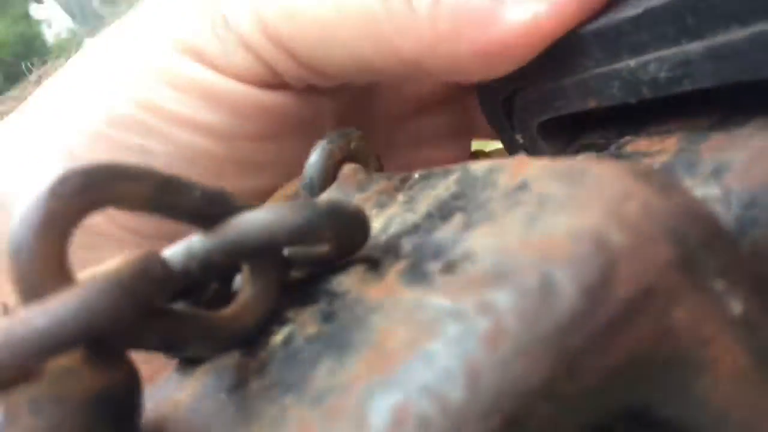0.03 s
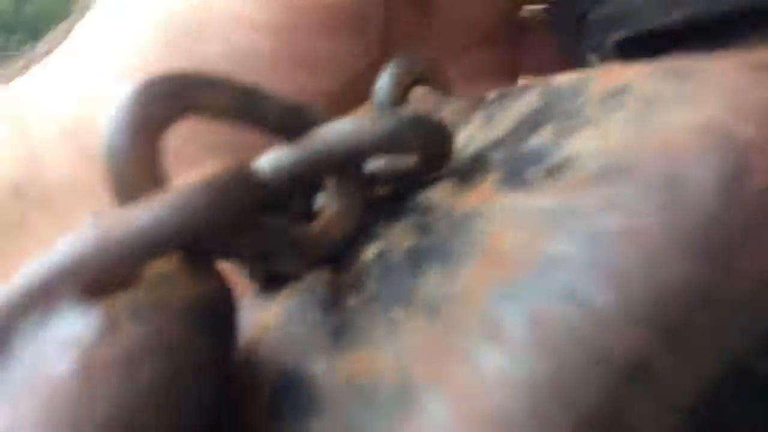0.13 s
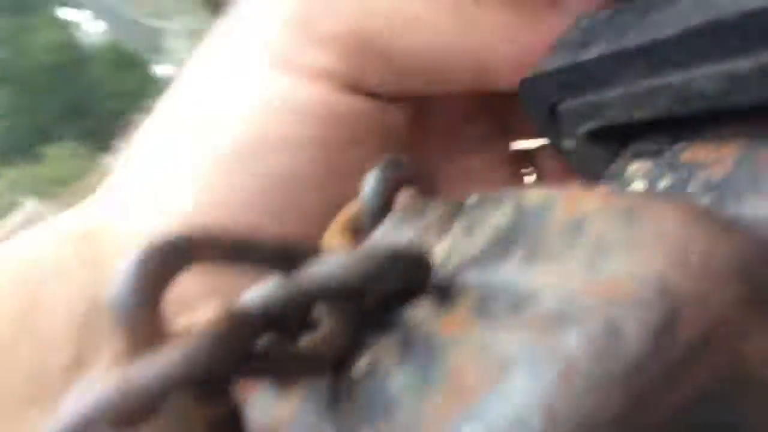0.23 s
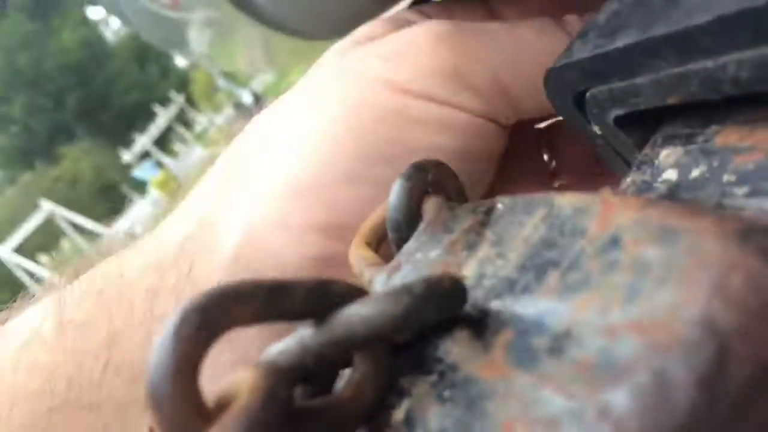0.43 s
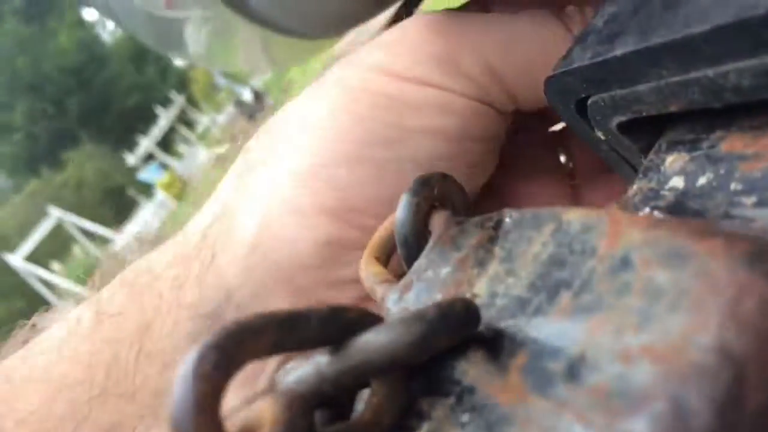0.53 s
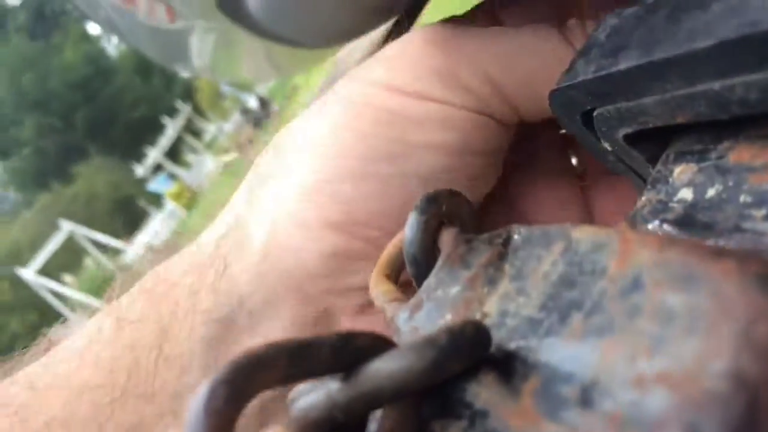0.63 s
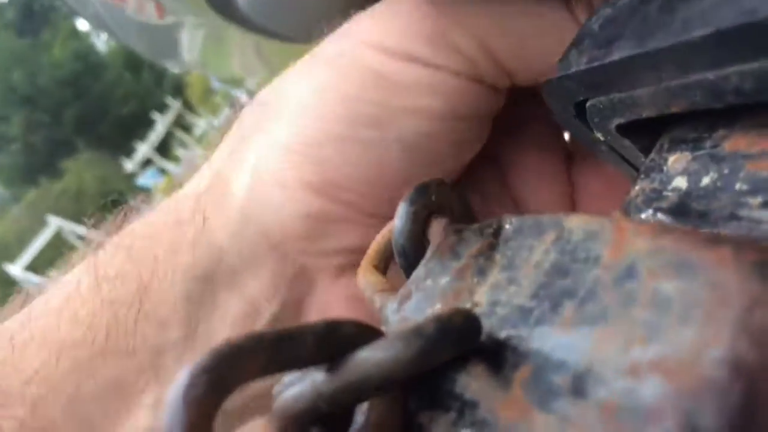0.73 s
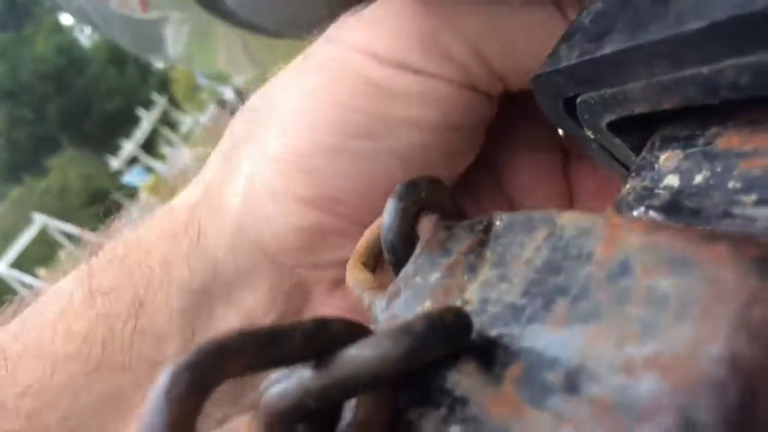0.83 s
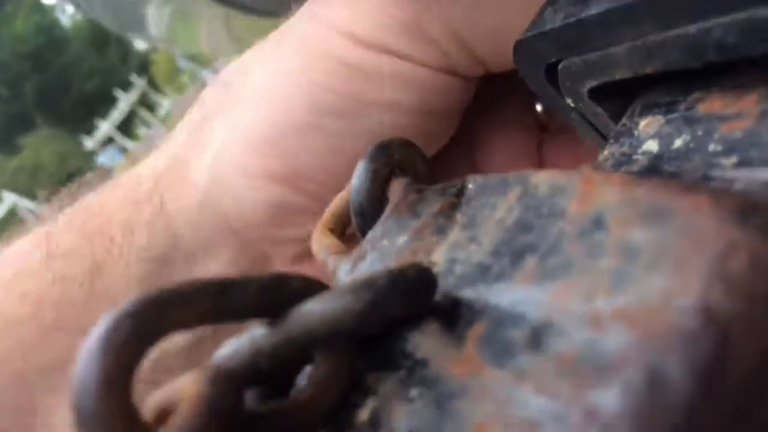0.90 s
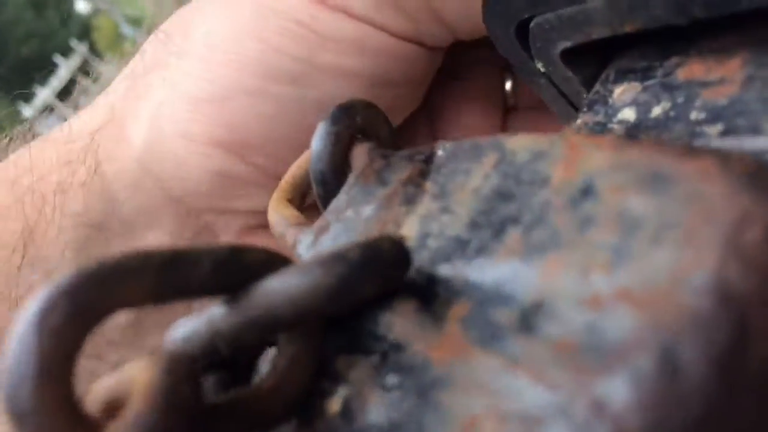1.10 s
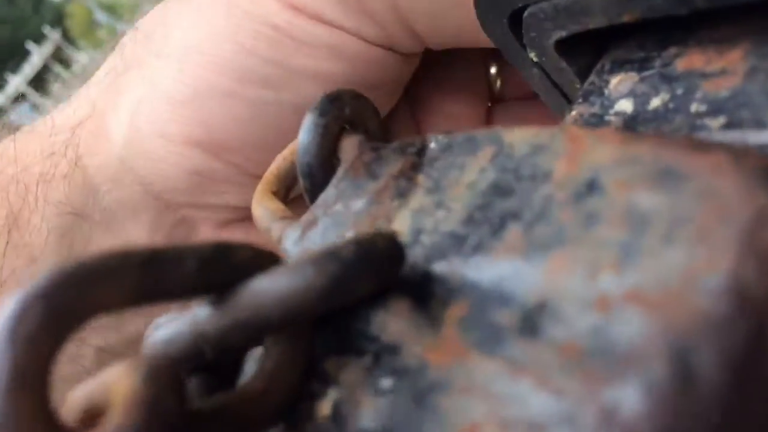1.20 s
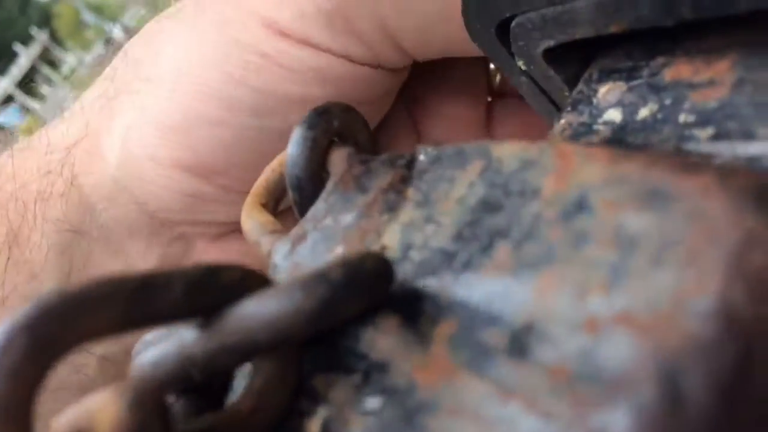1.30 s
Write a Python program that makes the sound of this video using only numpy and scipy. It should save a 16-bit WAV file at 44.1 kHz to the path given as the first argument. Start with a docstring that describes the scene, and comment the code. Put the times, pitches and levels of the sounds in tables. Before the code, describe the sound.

A chain knocks, rattles and snaps against a steel hitch, ringing briefly, close up.

```python
"""Outdoors, one microphone close to a rusty steel hitch part that carries a heavy chain.
A hand works it: a dull knock, a rattle that ends in a full clank, then a hard snap that leaves
a small pin ringing high. Each blow of steel on steel cracks at the contact and sets hitch, link,
pin and frame ringing. Light chain ticks fall in between and the hand rubs faintly at the end,
all over a low open-air rumble."""
import sys
import numpy as np
from scipy.fft import rfft, irfft, next_fast_len
from scipy.io import wavfile
from scipy.ndimage import map_coordinates

SR = 44100
rng = np.random.default_rng(int(sys.argv[2]) if len(sys.argv) > 2 else 0)


def materialize(psi):
    """Save the field psi as 16-bit PCM at rate SR to the path in sys.argv[1].

    A 1-D psi becomes a single channel; in a 2-D psi each row is a channel.
    """
    bounded = np.clip(np.atleast_2d(psi).T, -1, 1)
    quanta = np.round(bounded * 32767).astype(np.int16)
    wavfile.write(sys.argv[1], SR, quanta)


N = 59535

# Steel on steel. Each row: start in seconds, crack level in dB, crack cut-off in Hz, dense ring in dB,
# hitch cut-off in Hz, then levels in dB of the strong hitch modes, the link, the pin and the frame.
BLOWS = [(0.0652, -20, 1670, -23, 1550, -26.5, -21, -76, -47),
         (0.2188, -18.5, 11100, -40.5, 11850, -50, -47, -58, -42.5),
         (0.222, -11, 4500, -19.5, 4800, -54, -15, -64.5, -49),
         (0.235, -11, 5000, -19.5, 9184, -47, -22, -68, -42.5),
         (0.2582, -13, 9000, -10, 11880, -12.5, -43.5, -54.5, -31),
         (0.7838, -11.5, 13000, -38.5, 11780, -40.5, -44, -36, -47),
         (0.7868, -8.5, 11000, -20.5, 11000, -31, -36, -19.5, -28)]
# The harder contacts bark briefly, at a pitch set by where they land.
# Each row: start in seconds, pitch in Hz, level in dB, t60 in seconds.
BARKS = [(0.064, 900, -22.5, 0.011), (0.2224, 4190, -13.5, 0.048), (0.2336, 2950, -9.5, .018),
         (0.2591, 3900, -7, 0.018), (0.7871, 608, -23, 0.018), (0.7881, 2650, -5, 0.012),
         (0.905, 2216, -37.5, .03)]
# Light touches of the chain. Each row: start in seconds, level in dB, cut-off in Hz.
TICKS = [(.158, -62.5, 14000), (0.2112, -32.5, 3975), (0.3698, -54, 12000), (0.4253, -54, 7000),
         (.6395, -56, 5000), (0.698, -58.5, 7000), (0.763, -39, 12000), (0.7666, -34.5, 4000),
         (0.9058, -35.5, 2065)]
# The crack of a contact. Each row: frequency in Hz, relative noise density in dB.
CRACK_SPECTRUM = [(30, -32.5), (150, -13.5), (380, -9), (600, -7.5), (800, -15.5), (1050, -6), (1250, -14),
                  (1950, -2.5), (2200, -1), (2600, -5.5), (3400, -3), (4500, -9), (7000, -4.5), (9500, -8),
                  (13500, -11), (15500, -11.5)]
# The hitch's strong modes. List by list: pitch in Hz, relative level in dB, t60 in seconds.
HITCH_HZ = [592, 785, 989, 1135, 1224, 1494, 1539, 1660, 2248, 2312, 3095, 3235, 3770, 4360, 4744, 5612,
            6724, 7190, 9272, 11700, 14308]
HITCH_DB = [-20, -11, -14, -17, -20, -5, -1, -13, -11, -2, -11, -10, -9, -13, 3, -7, -9, -8, -12, -12, -27]
HITCH_T60 = [.17, .24, .24, .2, .18, .16, .16, .12, .12, .15, .09, .09, .11, .13, .12, .15, .095, .075, .17,
             .12, .29]
# The hitch's many weak modes, its dense ring. Each row: frequency in Hz, relative level in dB.
DENSE_LEVELS = [(250, -17.5), (400, -13), (700, -8.5), (1150, -4.5), (1750, 4), (2050, -3), (2300, 3),
                (3200, -2.5), (3550, -8.5), (4150, 1), (5300, -6.5), (7000, 0.5), (8300, -7.5),
                (10000, -2.5), (13000, -11.5), (16000, -21.5)]
# Their decay. Each row: frequency in Hz, t60 in seconds.
DENSE_T60 = [(250, 0.36), (800, 0.31), (2000, 0.11), (4000, 0.14), (8000, .1), (15000, 0.11)]
# A link damped by its neighbours. List by list: pitch in Hz, relative level in dB, t60 in seconds.
LINK_HZ = [2175, 3230, 4020, 4198, 5125, 6450]
LINK_DB = [0.5, -14, -15, -13.5, -17, -20.5]
LINK_T60 = [.055, .035, .028, .036, .05, .04]
# The small pin's modes. List by list: pitch in Hz, relative level in dB, t60 in seconds.
PIN_HZ = [2300, 4740, 5595, 5788, 6718, 9281, 9489, 10103, 11701, 12203, 14308, 15573]
PIN_DB = [-11, -33.5, -9, -13, -9, -8, -2, -1.5, -11, -13, -21, -16.5]
PIN_T60 = [.12, .32, .08, .13, .1, .15, .075, .19, .08, .33, .22, .17]
# The frame behind the hitch. Each row: pitch in Hz, relative level in dB, t60 in seconds.
FRAME_MODES = [(99, -8.5, 0.067), (140.6, 6, 0.23), (168.8, -3.5, 0.39), (222.2, -7.5, 0.39)]
# The hand pushes just before the parts meet. Each row: start in seconds, level in dB.
PUSHES = [(0.2095, -20), (0.776, -29.5)]
# Skin sliding on rust. Each row: middle in seconds, half length in seconds, level in dB.
RUBS = [(1.106, 0.023, -60.5), (1.309, 0.056, -66.5)]
# The hiss of a rub. Each row: frequency in Hz, relative noise density in dB.
RUB_SPECTRUM = [(500, -11), (1500, -3.5), (4000, 0.5), (6000, -10), (8000, -3), (15000, -13)]
# The open air around the microphone. Each row: frequency in Hz, relative noise density in dB.
AIR_SPECTRUM = [(15, -50), (25, -23.5), (60, -7.5), (90, -3.5), (130, -8), (185, -9.5), (240, -16),
                (370, -25), (650, -28.5), (1450, -29.5), (2300, -41), (4500, -49.5), (5800, -53.5),
                (7000, -48.5), (8500, -56.5), (12500, -59), (16000, -61.5)]
# Its slow drift. Each row: time in seconds, level change in dB.
AIR_DRIFT = [(0, 0), (.2, 1.5), (.45, -3.5), (.65, -1), (.87, -0.5), (1.04, -4.5), (1.14, 0.5),
             (1.35, -0.5)]

ATTACK_S, MODE_SCATTER_DB = 0.00046, 0.8
DENSE_LOW_HZ, DENSE_HIGH_HZ, DENSE_SCATTER_DB = 250, 16000, 4
AIR_DB, RUMBLE_TOP_HZ, WOBBLE_DB, WOBBLES_PER_S = -44.5, 120, 0.5, 38


def clanks(dense):
    """Close up, each blow cracks, rings hitch, link and pin in its own proportion and shakes the frame."""
    out = np.zeros(N)
    for start, crack_db, crack_hz, dense_db, cut_hz, hitch_db, link_db, pin_db, frame_db in BLOWS:
        contact = amp(crack_db) * crack(crack_hz)
        body = hitch(dense, dense_db, hitch_db, cut_hz)
        link = amp(link_db) * ring(LINK_HZ, LINK_DB, LINK_T60)
        pin = amp(pin_db) * ring(PIN_HZ, PIN_DB, PIN_T60)
        thud = amp(frame_db) * ring(*np.transpose(FRAME_MODES), build_cycles=4.3)
        add(out, start, contact + body + link + pin + thud)
    for start, hz, db, t60 in BARKS:
        add(out, start, ring([hz], [db], [t60]))
    return out


def crack(cut_hz):
    """The short burst at the point of contact; a softer contact loses its treble."""
    t = np.arange(N) / SR
    return noise(CRACK_SPECTRUM, cut_hz) * fade(t, t60=0.025, attack_s=ATTACK_S)


def hitch(dense, dense_db, modes_db, cut_hz):
    """The hitch answers one contact with its weak and its strong modes."""
    weak = filtered(dense, lambda hz: lowpass(hz, cut_hz))
    strong = ring(HITCH_HZ, HITCH_DB, HITCH_T60, cut_hz, build_cycles=3.7)
    return amp(dense_db) * weak + amp(modes_db) * strong


def dense_ring(count=340):
    """Crowded weak modes of the rusty steel, uneven in strength; the low ones last longest."""
    place = (np.arange(count) + rng.random(count)) / count
    hz = (np.sqrt(DENSE_LOW_HZ) + place * (np.sqrt(DENSE_HIGH_HZ) - np.sqrt(DENSE_LOW_HZ))) ** 2
    db = along(DENSE_LEVELS, hz) - DENSE_SCATTER_DB * rng.exponential(size=count)
    modes = ring(hz, db, along(DENSE_T60, hz), build_cycles=5.9, phase=rng.random((count, 1)))
    return modes / np.sqrt(np.sum(amp(db) ** 2) / 2)


def ring(hz, db, t60, cut_hz=np.inf, build_cycles=0, phase=0):
    """Struck modes build up and die away, their levels a little different at each blow."""
    hz, db, t60 = (np.asarray(v, float)[:, None] for v in (hz, db, t60))
    t = np.arange(SR // 2) / SR
    gain = amp(db + MODE_SCATTER_DB * rng.standard_normal(hz.shape)) * lowpass(hz, cut_hz)
    envelope = fade(t, t60, ATTACK_S + build_cycles / hz)
    partials = gain * envelope * np.sin(2 * np.pi * (hz * t + phase))
    return np.pad(partials.sum(0), (0, N - len(t)))


def chain_ticks(dense):
    """Light touches of the chain barely wake the hitch."""
    out = np.zeros(N)
    for start, db, cut_hz in TICKS:
        tick = crack(cut_hz) + hitch(dense, dense_db=-6, modes_db=-16, cut_hz=cut_hz)
        add(out, start, amp(db) * tick)
    return out


def hand_pushes():
    """A soft low bump as the hand takes the weight."""
    out = np.zeros(N)
    for start, db in PUSHES:
        add(out, start, ring(hz=[150], db=[db], t60=[0.05], build_cycles=0.4))
    return out


def hand_rubs():
    """Near the microphone the hand shifts its grip, and skin hisses faintly on rust."""
    t = np.arange(N) / SR
    swells = sum(amp(db) * np.exp(-((t - middle) / half) ** 2) for middle, half, db in RUBS)
    return noise(RUB_SPECTRUM) * swells


def open_air():
    """Behind it all, a low rumble that wavers and a little hiss; both drift slowly."""
    t = np.arange(N) / SR
    air = noise(AIR_SPECTRUM)
    rumble = filtered(air, lambda hz: lowpass(hz, RUMBLE_TOP_HZ))
    wobble = map_coordinates(rng.standard_normal(size=128), [t * WOBBLES_PER_S])
    air = unit(air + rumble * (amp(WOBBLE_DB * wobble) - 1))
    drift_db = np.interp(t, *np.transpose(AIR_DRIFT))
    return amp(AIR_DB + drift_db) * air


def noise(spectrum, cut_hz=np.inf):
    """Coloured noise of rms 1."""
    white = rng.standard_normal(N)
    return unit(filtered(white, lambda hz: amp(along(spectrum, hz)) * lowpass(hz, cut_hz)))


def fade(t, t60, attack_s):
    """A quick rise and a decay of 60 dB in t60 seconds."""
    return np.exp(-np.log(1000) * t / t60) * (1 - np.exp(-t / attack_s))


def lowpass(hz, cut_hz, order=2.5):
    """Gain that falls by 6 dB an octave per order above the cut-off."""
    return 1 / np.sqrt(1 + (hz / cut_hz) ** (2 * order))


def filtered(x, response):
    """Shape a sound by a gain that depends on frequency."""
    size = next_fast_len(len(x) + 8192)
    hz = np.fft.rfftfreq(size, 1 / SR)
    return irfft(rfft(x, size) * response(hz), size)[:len(x)]


def along(points, hz):
    """Read a curve on a log frequency axis."""
    point_hz, values = np.transpose(points)
    return np.interp(np.log(hz + 1), np.log(point_hz + 1), values)


def add(track, start, sound):
    """Lay a sound into the track at a start in seconds."""
    i = round(start * SR)
    track[i:] += sound[:N - i]


def amp(db):
    """Decibels to amplitude."""
    return 10 ** (np.asarray(db) / 20)


def unit(x):
    """Scale to rms 1."""
    return x / np.sqrt(np.mean(x ** 2) + 1e-20)


def scene():
    """Hitch, chain and hand up close, the open air behind, in mono."""
    dense = dense_ring()
    return (clanks(dense) + chain_ticks(dense) + hand_pushes() + hand_rubs() + open_air())[None]


def record(dry):
    """At the microphone the loudest peaks are rounded off and the very top is cut steeply."""
    rounded = dry[0] / (1 + dry[0] ** 6) ** (1 / 6)
    return filtered(rounded, lambda hz: lowpass(hz, cut_hz=16000, order=80))[None]


dry = scene()
out = record(dry)
materialize(out)
```